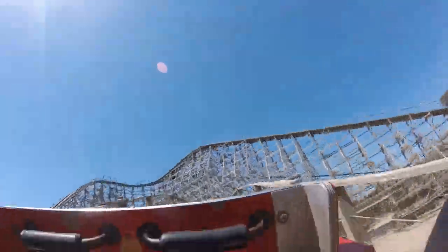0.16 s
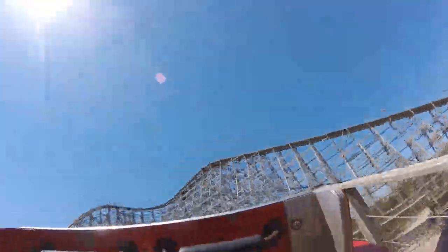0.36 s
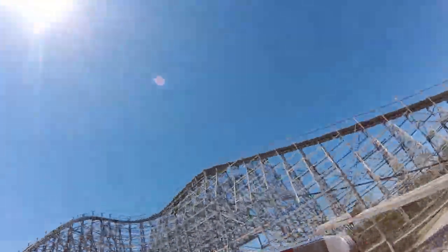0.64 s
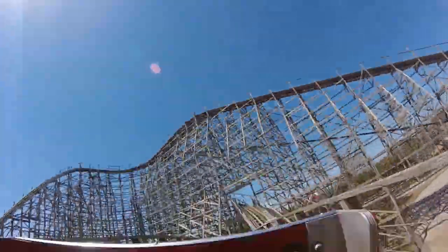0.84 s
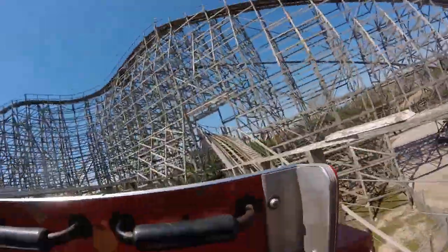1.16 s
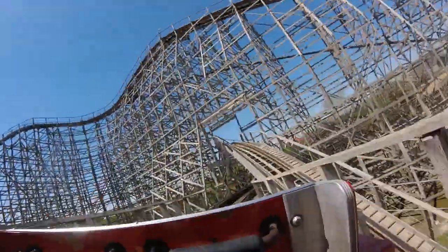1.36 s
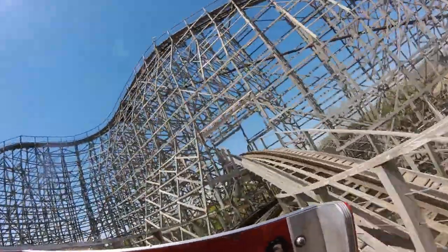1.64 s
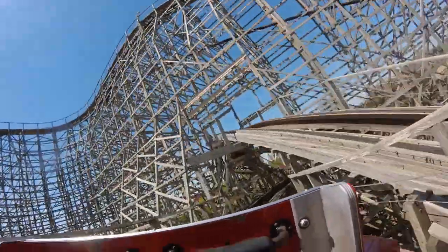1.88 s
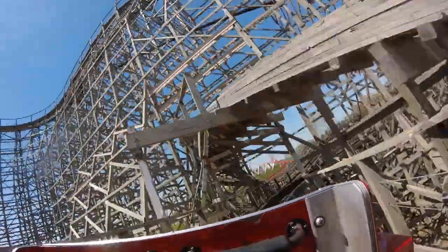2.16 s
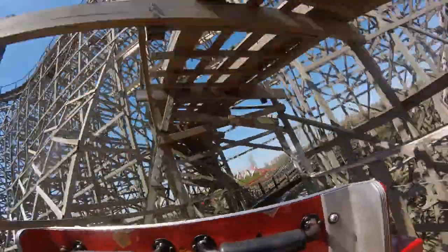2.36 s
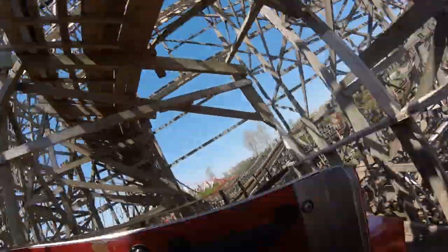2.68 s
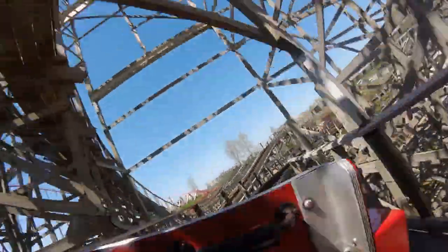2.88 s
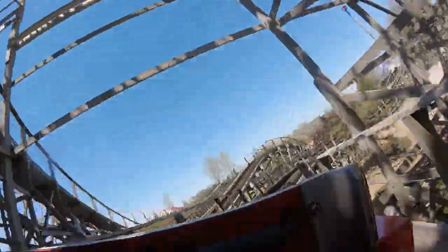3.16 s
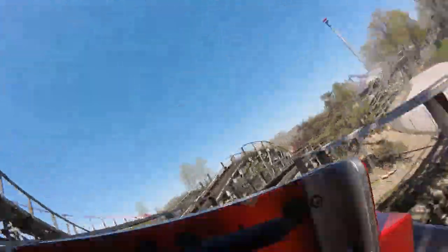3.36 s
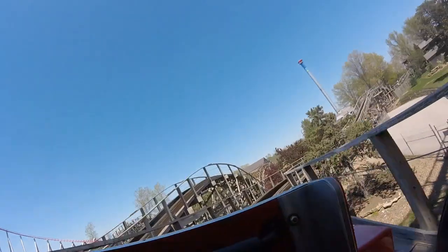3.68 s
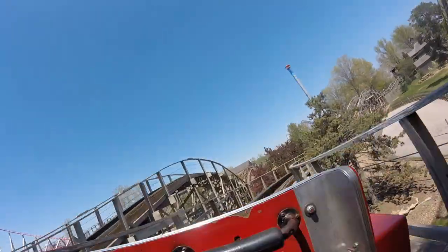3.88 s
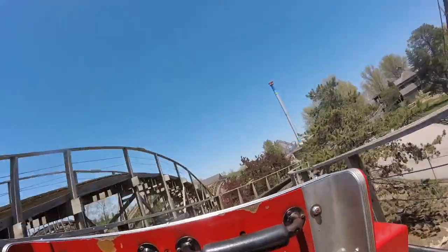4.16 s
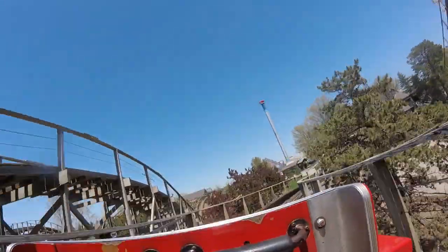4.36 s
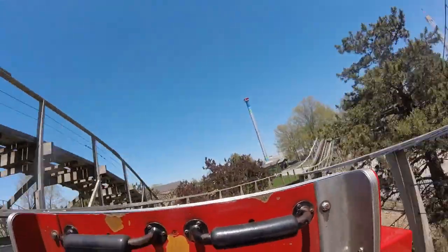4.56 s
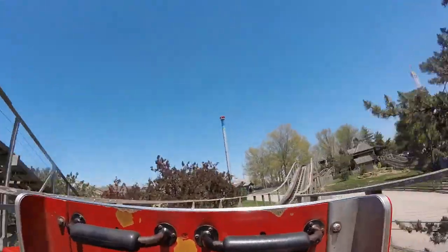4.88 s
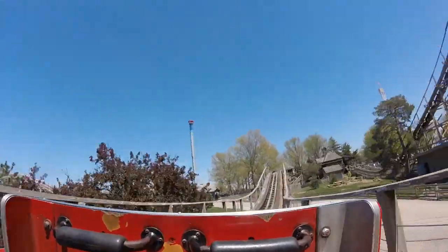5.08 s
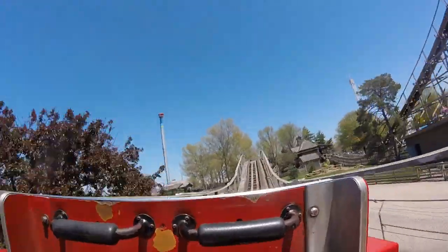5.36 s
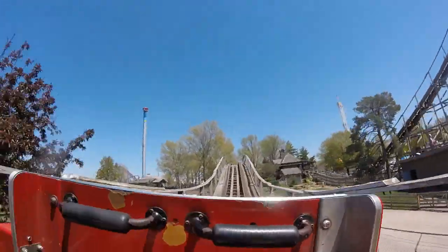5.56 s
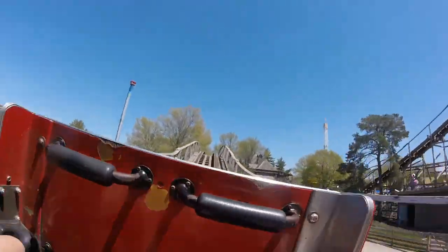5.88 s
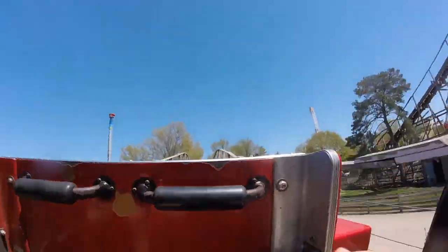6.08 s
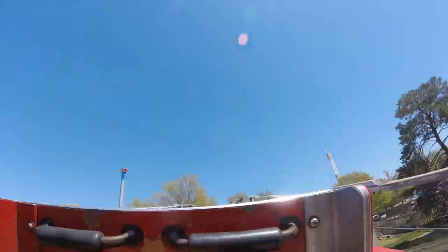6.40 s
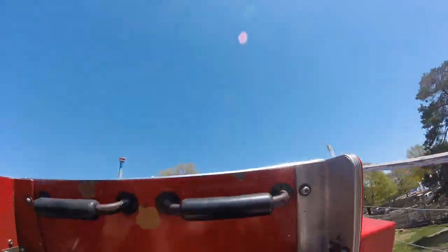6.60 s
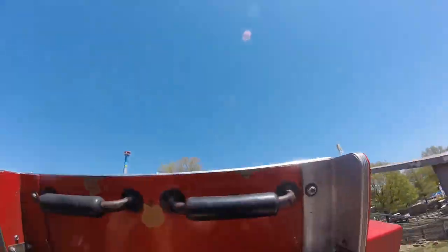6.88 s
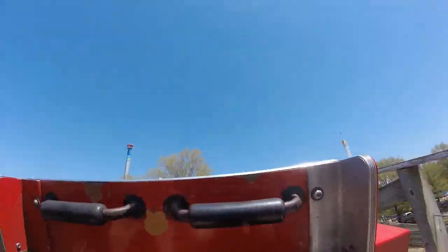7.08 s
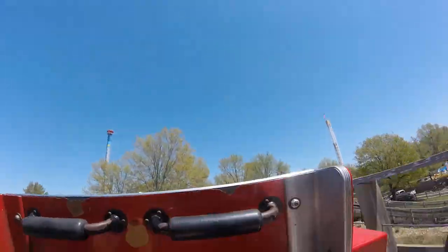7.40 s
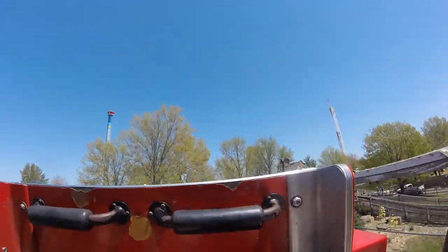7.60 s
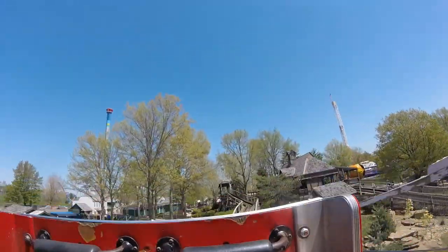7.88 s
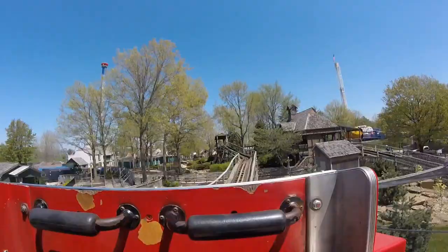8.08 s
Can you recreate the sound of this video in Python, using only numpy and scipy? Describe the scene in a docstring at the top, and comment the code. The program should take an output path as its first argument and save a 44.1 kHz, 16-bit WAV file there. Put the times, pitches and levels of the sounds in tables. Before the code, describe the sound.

A microphone rides in the front car of a wooden roller coaster, outdoors and close, with no noticeable echo. At 0-0.4 s low gust thuds hit, with a hard click at 0.3 and a brief faint jingle of loose parts. The wheel roar is light until about 1 s, when a cluster of strong steel knocks and the first body thump bring full rumble, timber clatter, rattling fittings and panel buzz. From 1.2 to 5.9 s the ride is dense and jolting: several irregular knocks a second, short shudders, deep thumps, a sharp rattling jolt near 2, clicks at 2.4, 3.1 and 5.4, wind flapping low. Between 6 and 7.3 s crisp clicks crowd in, and a gust at 6.4 chokes the other sound hardest. The roar thins around 7.3, another click lands at 7.65, and heavy ringing knocks with a thump close it at 8.05-8.2.

```python
"""The front car of a wooden roller coaster, about eight seconds, with the microphone on board in the wind.
From the start steel wheels roar and knock over rail joints; gusts hit, and a hard click sounds close by.
Loose parts jingle briefly, then from about one second body thumps join the shudders, rattles and panel buzz.
After six seconds close clicks crowd in and a gust chokes the microphone hardest; late knocks end the ride.
Noise through resonances makes roar and rattle, decaying sines the rings, pressure pulses thumps and gusts."""
import sys
import numpy as np
from scipy import signal
from scipy.fft import rfft, irfft, next_fast_len
from scipy.io import wavfile
from scipy.ndimage import uniform_filter1d

SR = 44100
rng = np.random.default_rng(int(sys.argv[2]) if len(sys.argv) > 2 else 0)


def transcribe(signal):
    """Save signal, clipped to [-1, 1], as a 16-bit WAV file at the path in sys.argv[1]."""
    frames = np.atleast_2d(signal).T
    limited = np.clip(frames, -1, 1)
    pcm = np.round(limited * 32767).astype(np.int16)
    wavfile.write(sys.argv[1], SR, pcm)


N = 363384
TIME = np.arange(N) / SR
FFT_SIZE = next_fast_len(N + SR // 2) * 2
BIN_HZ = np.arange(FFT_SIZE // 2 + 1) * SR / FFT_SIZE

# How hard the wheels press and roll on the rail. Each row: time in seconds, relative roar in dB.
ROLLING = [(0, -35), (.18, -43.5), (.3, -32), (.35, -49.5), (.48, -45), (.62, -40.5), (1.04, -33.5),
           (1.27, -28), (1.8, -32), (2.08, -30), (2.37, -37), (2.58, -32), (3.15, -30), (4.0, -35.5),
           (5.25, -33), (5.55, -37), (5.82, -31), (6.45, -37), (7.0, -37), (7.3, -41), (7.6, -33.5),
           (8.03, -39.5), (8.15, -41)]
# The track structure rumbles under the train's weight. Each row: time in seconds, relative rumble in dB.
LOAD = [(0, -45.5), (.3, -28), (.38, -45), (.65, -37), (.78, -31.5), (1.25, -32.5), (1.5, -28.5),
        (1.75, -26), (2.0, -30), (2.4, -31), (3.05, -29), (3.88, -34.5), (4.03, -32.5), (4.35, -30.5),
        (4.75, -30.5), (5.55, -29.5), (6.3, -25.5), (6.7, -31), (7.2, -29.5), (7.5, -31), (7.65, -29.5),
        (8.24, -27)]
# The car sways against the side rail and shudders.
# Each row: start in seconds, length of the hold in seconds, relative rattle in dB.
SHUDDERS = [(0.64, 0.021, -49), (0.868, 0.054, -43), (1.097, 0.12, -38.5), (1.36, 0.12, -43),
            (1.597, 0.4, -51), (1.967, 0.023, -28.5), (2.07, 0.036, -38), (2.149, 0.052, -39),
            (2.463, 0.12, -40), (2.739, 0.16, -42.5), (2.935, 0.2, -41), (3.31, 0.025, -36),
            (3.422, 0.053, -36), (3.573, 0.18, -41), (3.835, 0.051, -40.5), (3.987, 0.066, -46.5),
            (4.274, 0.16, -39.5), (4.512, 0.062, -38.5), (4.62, 0.28, -46), (5.033, 0.099, -39.5),
            (5.178, 0.25, -38), (5.58, 0.054, -45), (5.73, 0.18, -43.5), (5.952, 0.38, -41.5),
            (6.507, 0.037, -40.5), (6.653, 0.13, -47.5), (6.862, 0.36, -43), (7.369, 0.045, -42),
            (7.53, 0.063, -47), (7.744, 0.22, -66), (8.046, 0.22, -41)]
# Wheels knock over the rail joints.
# Each row: start in seconds, relative strength in dB, noise decay by 60 dB in seconds, ring pitch in Hz.
KNOCKS = [(0.264, -24, 0.04, 1394), (0.275, -22, 0.029, 1476), (0.481, -32, 0.091, 1235),
          (.532, -36, 0.054, 1360), (.626, -39, 0.036, 1410), (0.6501, -20.5, 0.11, 1487),
          (0.712, -23.5, 0.03, 1380), (0.8704, -23.5, 0.19, 1460), (0.9817, -20, 0.21, 1420),
          (1.029, -25, 0.036, 1324), (1.085, -10.5, 0.095, 1440), (1.118, -25, 0.035, 1490),
          (1.179, -14, 0.066, 1280), (1.206, -13.5, 0.074, 1442), (1.2118, -15, 0.073, 1480),
          (1.31, -19, 0.097, 1373), (1.349, -19.5, 0.028, 1326), (1.412, -21, 0.04, 1260),
          (1.464, -22, 0.57, 1450), (1.558, -21.5, 0.032, 1390), (1.621, -17.5, 0.15, 1364),
          (1.64, -23, 0.047, 1440), (1.791, -23, 0.055, 1260), (1.852, -21, 0.09, 1340),
          (1.892, -24, 0.04, 1300), (1.964, -21, 0.1, 1400), (1.985, -16.5, 0.36, 1260),
          (2.07, -14.5, 0.057, 1440), (2.0784, -14.5, 0.098, 1450), (2.107, -18, 0.029, 1355),
          (2.168, -22, 0.058, 1420), (2.242, -21, 0.12, 1395), (2.34, -24.5, 0.04, 1340),
          (2.47, -22, 0.029, 1510), (2.5263, -22, 0.03, 1420), (2.554, -19, 0.069, 1416),
          (2.573, -22, 0.037, 1340), (2.672, -22.5, 0.07, 1310), (2.704, -23, 0.044, 1470),
          (2.785, -25, 0.044, 1310), (2.832, -18, 0.072, 1495), (2.882, -27, .04, 1410),
          (2.946, -21, 0.06, 1420), (2.9535, -16.5, 0.079, 1386), (2.9855, -16.5, 0.11, 1266),
          (3.038, -19, 0.033, 1400), (3.0437, -15, 0.035, 1340), (3.102, -15.5, 0.091, 1395),
          (3.121, -18, 0.081, 1405), (3.343, -25, 0.04, 1350), (3.44, -29, 0.044, 1280),
          (3.469, -21.5, 0.044, 1434), (3.5, -21, 0.065, 1440), (3.566, -16, 0.094, 1385),
          (3.608, -16.5, 0.05, 1450), (3.673, -17.5, 0.05, 1520), (3.7, -22, .04, 1420),
          (3.7157, -16, 0.035, 1310), (3.8, -25.5, 0.049, 1464), (4.1286, -20, 0.09, 1430),
          (4.318, -20.5, 0.04, 1290), (4.3598, -22, 0.041, 1315), (4.402, -18.5, 0.12, 1345),
          (4.424, -15, 0.079, 1370), (4.542, -23, 0.072, 1384), (4.561, -25, 0.04, 1330),
          (4.616, -23.5, 0.037, 1330), (4.66, -23, 0.036, 1430), (4.689, -17, 0.016, 1316),
          (4.722, -37, 0.028, 1400), (4.7592, -15, 0.048, 1386), (4.79, -20.5, 0.1, 1320),
          (4.8645, -21, 0.093, 1440), (4.89, -20, 0.03, 1410), (5.02, -20, 0.05, 1350),
          (5.046, -19.5, .05, 1310), (5.095, -29, 0.033, 1390), (5.1165, -25, 0.042, 1270),
          (5.191, -20, 0.19, 1310), (5.208, -19, .06, 1370), (5.235, -20, 0.055, 1350),
          (5.392, -19, 0.082, 1445), (5.488, -18.5, 0.041, 1420), (5.602, -22, 0.078, 1437),
          (5.628, -22.5, 0.03, 1310), (5.67, -20, 0.04, 1260), (5.79, -16.5, 0.11, 1410),
          (5.814, -18.5, 0.028, 1440), (5.887, -24, 0.028, 1340), (6, -20, 0.03, 1290),
          (6.179, -22.5, 0.17, 1300), (6.221, -17, 0.091, 1570), (6.249, -19.5, 0.072, 1220),
          (6.444, -19.5, 0.016, 1270), (6.657, -14.5, 0.045, 1336), (6.753, -32, 0.04, 1270),
          (6.871, -24.5, 0.086, 1235), (7.012, -23, 0.05, 1360), (7.5528, -24, 0.047, 1390),
          (7.606, -19.5, 0.051, 1185), (7.674, -29, 0.07, 1370), (7.8924, -20, 0.18, 1193),
          (8.053, -12, 0.22, 1520), (8.13, -18, 0.59, 1440), (8.173, -23, 0.04, 1360),
          (8.194, -28, .04, 1400)]
# A struck wheel rings. Each row: multiple of the ring pitch, decay by 60 dB in seconds, relative dB.
WHEEL_MODES = [(.87, 0.054, -1.5), (1.001, 0.047, 4.5), (1.089, 0.12, -6.5), (2.03, 0.024, -12)]
# Timber under a struck wheel knocks short and dry. Each row: Hz, decay by 60 dB in seconds, relative dB.
PLANK_MODES = [(336, .035, -1.5), (475, 0.027, -5.5), (704, 0.027, -0.5), (940, 0.011, -1)]
# Resonances of wheels and car. Each row: centre in Hz, width in Hz, relative dB.
CAR_MODES = [(1016, 300, -10), (1243, 91, -4.5), (1456, 297, -2.5), (1817, 112, -12.5), (2046, 82, -15)]
# Resonances of the thin sheet panels. Each row: centre in Hz, width in Hz, relative dB.
PANEL_MODES = [(2380, 790, -17.5), (2800, 430, -2), (3156, 150, -5.5)]
# How freely the sheet panels buzz. Each row: time in seconds, gain in dB.
PANEL_BUZZ = [(0, 0.5), (1.1, 0), (2.5, -.5), (4.5, 0.5), (5.6, 0), (6.2, 3), (7.0, 2.5), (8.24, 2.5)]
# Resonances of the loose steel fittings. Each row: centre in Hz, width in Hz, relative dB.
FITTING_MODES = [(3460, 190, 6), (3820, 430, -0.5), (4420, 550, 3.5), (4950, 210, 2), (5280, 130, 3),
                 (5480, 250, -3), (6190, 470, 2), (6700, 1450, -9), (7440, 920, -8), (8300, 950, -19.5)]
# Spectra of timber, track rumble and bright sizzle. Each row: frequency in Hz, relative dB per Hz.
TIMBER_SPECTRUM = [(150, -14), (260, -1.5), (350, 1), (500, -2), (650, -2.5), (770, -2.5), (920, -9),
                   (1300, -3), (2500, -98.5)]
RUMBLE_SPECTRUM = [(35, -30), (70, -1), (110, 3.5), (160, -0.5), (220, -5), (300, -11), (600, -71)]
SIZZLE_SPECTRUM = [(7000, -28), (8800, -5), (10500, 3), (12000, -11.5), (13500, -27.5), (15500, -31.5)]
# The car body thumps. Each row: start in seconds, peak of the push in dB, length of the push in seconds.
THUMPS = [(1.169, -13, 0.0029), (1.428, -16, 0.0064), (1.499, -10.5, 0.015), (1.972, -11.5, 0.0095),
          (1.984, -23, 0.0028), (2.079, -8.5, 0.0042), (2.126, -20, .012), (2.582, -10, 0.0065),
          (3.119, -9, 0.0079), (3.502, -11, 0.009), (3.56, -25, 0.0092), (3.612, -13, 0.0065),
          (3.757, -16.5, 0.008), (3.918, -10.5, 0.011), (4.308, -10, 0.011), (4.429, -20, 0.012),
          (4.822, -12, 0.018), (4.963, -16, 0.0049), (5.07, -13.5, 0.0036), (5.188, -13, 0.0047),
          (5.299, -11, 0.015), (5.7676, -8, 0.0071), (5.927, -11.5, 0.0077), (6.015, -11, 0.0084),
          (6.262, -24, 0.0091), (6.542, -10, 0.01), (6.687, -10.5, 0.004), (7.126, -10, 0.0037),
          (8.17, -11, 0.0071)]
# Hard clicks beside the microphone.
# Each row: start in seconds, relative level in dB, hardness in dB per octave from 2 kHz, pitch in Hz.
CLICKS = [(0.304, -13, -11, 2030), (2.397, -7, -7.5, 2130), (3.1095, -9, -13, 2000), (5.4136, -30, 8, 2000),
          (6.0187, -21.5, 10, 2150), (6.375, -17, -5, 1950), (6.5422, -12.5, 4, 1960),
          (6.6870, -20, 10, 2060), (6.949, -19.5, 3, 2000), (7.1254, -21.5, 7, 1950), (7.274, -29, 2, 2000),
          (7.6578, -12, -11, 1950)]
# Resonances of the clicking part at 2 kHz pitch. Each row: Hz, decay by 60 dB in seconds, relative dB.
CLICK_MODES = [(636, 0.0062, -12), (1400, 0.009, -10), (1937, 0.009, -1), (2300, 0.0055, 0),
               (2650, 0.0065, -3), (3110, 0.011, -10), (3930, 0.01, -14), (5530, 0.0068, -17)]
# Spectrum of the crack in a click. Each row: frequency in Hz, relative dB per Hz.
CRACK_SPECTRUM = [(150, -5), (500, 3), (1400, -13.5), (2000, 15.5), (2700, -3.5), (3600, -22.5),
                  (5000, -27), (6300, -14.5), (8000, -27), (12000, -39)]
# Loose parts drop back. Each row: start in seconds, level in dB, decay by 60 dB in seconds.
JINGLES = [(.345, -50, .05), (.368, -50, .04), (.386, -52, 0.066), (.415, -53, 0.055), (6.835, -45, .04),
           (6.852, -47, .03), (7.839, -32, 0.027)]
# A thin high whine that comes and goes. Each row: time in seconds, relative level in dB.
WHINE = [(0, -85), (.8, -93), (1.2, -85), (1.9, -80), (2.4, -89), (4, -86.5), (7.3, -89), (7.7, -89),
         (8.24, -82)]
# Airflow over the microphone. Each row: time in seconds, relative buffeting in dB.
WIND = [(0, -18.5), (.4, -21.5), (.9, -22.5), (1.5, -23.5), (1.95, -11.5), (2.8, -17), (3.75, -17.5),
        (4.25, -22), (4.55, -19), (5.1, -17), (5.9, -16.5), (6.3, -14), (6.6, -32), (7.38, -17),
        (7.65, -26), (8.08, -30), (8.2, -15.5)]
# Spectrum of the buffeting. Each row: frequency in Hz, relative dB per Hz.
BUFFET_SPECTRUM = [(4, -11), (12, 2), (22, 2), (32, -10.5), (48, -14), (70, -24.5), (140, -39), (500, -100)]
# Gusts hit the microphone.
# Each row: time of the snap in seconds, pressure peak in dB, dip of other sound in dB (negative lifts it).
GUSTS = [(0.035, -5.5, 4.5), (0.137, -8, -5.5), (0.311, -5, 10), (1.52, -12.5, 2.5), (2.405, -7.5, -3.5),
         (3.251, -8, 2.5), (3.54, -10, 0), (3.746, -7, -4.5), (3.941, -7.5, -1.5), (4.451, -7, -1.5),
         (4.125, -9, -0.5), (4.8, -15.5, -1), (4.948, -9.5, -2.5), (5.326, -7.5, 2.5), (5.469, -7.5, -0.5),
         (5.665, -7.5, 0.5), (6.024, -5.5, 6), (6.389, -5, 17.5), (6.619, -7, 12.5), (6.803, -8, 9.5),
         (7.041, -8, 4.5), (7.28, -7.5, -2.5)]

# timber and rattle follow the roar: relative level at the usual roar, and exponent on its swing
USUAL_ROAR_DB = -33
TIMBER_DB, TIMBER_FOLLOWS = -33, 0.88
RATTLE_DB, RATTLE_FOLLOWS = -46.5, 0.71
# what a shudder adds to the other layers, relative to its rattle
SHUDDER_WHEELS_DB, SHUDDER_TIMBER_DB, SHUDDER_RUMBLE_DB = 7.5, 5.5, 8.5
SHUDDER_ATTACK_S, SHUDDER_RELEASE_S = 0.005, 0.023
# noise stirred by a knock, relative to its strength
KNOCK_ROAR_DB, KNOCK_THUD_DB, KNOCK_RATTLE_DB = -8.3, -10.3, -30.5
KNOCK_RISE_S = 0.0012
HEAVE_DB, HEAVES_PER_S = 2.0, 2.5
CHATTER_DB, CHATTER_SPREAD_DB = 8, 9
CLICK_USUAL_HZ, WHINE_HZ, CUTOFF_HZ = 2000, 9650, 15700
CHOKE_RECOVERY_S = 0.018


def from_db(db):
    """Decibels to gain."""
    return 10 ** (np.asarray(db) / 20)


def rms_one(x):
    """Scale to unit power."""
    return x / np.sqrt(np.mean(x ** 2) + 1e-20)


def gain_in_time(rows):
    """A dB curve as a gain per sample."""
    s, db = np.transpose(rows)
    return from_db(np.interp(TIME, s, db))


def drift(rate):
    """Slow random wandering with spread 1: noise through two equal low-pass poles at rate (Hz)."""
    step = 40  # samples between drawn values
    pole = np.exp(-2 * np.pi * rate * step / SR)
    draws = rng.standard_normal(N // step + 2002)
    slow = signal.lfilter([1], [1, -2 * pole, pole * pole], draws)[2000:]  # drop the settling
    return np.interp(np.arange(N) / step, np.arange(len(slow)), rms_one(slow))


def sloped(points):
    """Frequency response through (Hz, dB) points, straight over log frequency."""
    hz, db = np.transpose(points)
    return from_db(np.interp(np.log(BIN_HZ + 1e-9), np.log(hz), db))


def resonant(modes):
    """Frequency response of steep-sided resonances whose powers add."""
    power = 0
    for hz, width, db in modes:
        offset = (BIN_HZ - hz) / width
        power = power + (from_db(db) / (1 + 2 * offset ** 2)) ** 2
    return np.sqrt(power)


def noise(response, even_s):
    """Coloured noise of unit power, its level evened over even_s."""
    x = irfft(rfft(rng.standard_normal(FFT_SIZE)) * response)[:N]
    power = uniform_filter1d(x ** 2, max(int(even_s * SR), 2))
    return x / np.sqrt(power + 1e-20)


def blows(times, levels_db, rise_s, t60s):
    """Envelope of blows that swell quickly and die away; their powers add."""
    power = np.zeros(N)
    for s, db, t60 in zip(times, levels_db, t60s):
        start = int(s * SR)
        age = TIME[:min(SR // 2, N - start)]
        shape = (1 - np.exp(-age / rise_s)) * np.exp(-np.log(1000) * age / t60)
        power[start:start + len(age)] += (from_db(db) * shape / shape.max()) ** 2
    return np.sqrt(power)


def clatter(per_s, spread_db, t60, steady):
    """Envelope of many small random impacts over a steady share of power; mean power about one."""
    hits = rng.random(N) < per_s / SR
    impacts = hits * from_db(spread_db * (2 * rng.random(N) - 1)) ** 2
    decay = np.exp(-2 * np.log(1000) / (t60 * SR))
    power = signal.lfilter([1], [1, -decay], impacts)
    power = power / (uniform_filter1d(power, SR // 6) + 1e-9)
    envelope = np.sqrt(steady + (1 - steady) * np.maximum(power, 0))
    return uniform_filter1d(envelope, SR // 700)


def add(out, s, sound):
    """Mix a sound in at time s."""
    start = max(int(s * SR), 0)
    out[start:start + len(sound)] += sound[:max(N - start, 0)]


def struck(modes, rise_s, detune):
    """One blow: every mode is a decaying sine with a random strength and tuning of its own."""
    age = TIME[:SR // 12]
    total = np.zeros(len(age))
    for hz, t60, db in modes:
        stray_db, tuning = rng.standard_normal(2)
        decay = np.exp(-np.log(1000) * age / t60)
        tone = np.sin(2 * np.pi * hz * (1 + detune * tuning) * age)
        total += from_db(db + stray_db) * decay * tone
    return total * (1 - np.exp(-age / rise_s))


def train(rumble, timber, wheels, rattle):
    """Rolling and knocking shake the timber, the car, its panels and its fittings together."""
    s, knock_db, t60, _ = np.transpose(KNOCKS)
    shaking = from_db(-1.9) * clatter(per_s=100, spread_db=5, t60=0.045, steady=0.42)
    jingling = clatter(per_s=180, spread_db=9, t60=0.088, steady=0.23)

    heave = from_db(-1.3 + HEAVE_DB * drift(HEAVES_PER_S))
    track = rumble * heave * noise(sloped(RUMBLE_SPECTRUM), even_s=0.04)

    thuds = blows(s, knock_db + KNOCK_THUD_DB, 0.0048, t60)
    wood = np.hypot(timber * shaking, thuds) * noise(sloped(TIMBER_SPECTRUM), even_s=0.023)

    knocked = blows(s, knock_db + KNOCK_ROAR_DB, KNOCK_RISE_S, t60)
    rolling = np.hypot(wheels * shaking, knocked)
    steel = rolling * noise(resonant(CAR_MODES), even_s=0.01)

    # loose parts are thrown up by a knock and settle a little after it
    tossed = blows(s, knock_db + KNOCK_RATTLE_DB, 0.015, t60)
    thrown = jingling * np.hypot(from_db(-6.5) * rattle * np.sqrt(shaking), tossed)
    loose = thrown * noise(resonant(FITTING_MODES), even_s=0.023)

    # the panels buzz with both the wheels and the fittings
    driven = np.hypot(from_db(-12) * rolling, from_db(-3) * rattle * shaking)
    panels = gain_in_time(PANEL_BUZZ) * driven * noise(resonant(PANEL_MODES), even_s=0.013)

    # the top octave grows faster than the rattle itself
    sizzle = from_db(-9) * thrown ** 1.5 * noise(sloped(SIZZLE_SPECTRUM), even_s=0.04)
    return track + wood + steel + panels + loose + sizzle


def ride():
    """Gains of rumble, timber, wheels and rattle: they follow load and rolling, and swell in a shudder."""
    roar, shudder = gain_in_time(ROLLING), shudders()
    effort = roar / from_db(USUAL_ROAR_DB)
    rumble = np.hypot(gain_in_time(LOAD), from_db(SHUDDER_RUMBLE_DB) * shudder)
    timber = np.hypot(from_db(TIMBER_DB) * effort ** TIMBER_FOLLOWS, from_db(SHUDDER_TIMBER_DB) * shudder)
    wheels = np.hypot(roar, from_db(SHUDDER_WHEELS_DB) * shudder)
    rattle = np.hypot(from_db(RATTLE_DB) * effort ** RATTLE_FOLLOWS, shudder)
    return rumble, timber, wheels, rattle


def shudders():
    """Each shudder builds quickly, holds and dies away; their powers add."""
    power, age = np.zeros(N), TIME[:SR]
    for s, length, db in SHUDDERS:
        release = np.exp(-np.maximum(age - length, 0) / SHUDDER_RELEASE_S)
        shape = np.minimum(age / SHUDDER_ATTACK_S, 1) * release
        add(power, s, (from_db(db) * shape) ** 2)
    return np.sqrt(power)


def wheel_blows(wheels, knock_db, plank_db, chatter_hz, count):
    """Wheel and timber ring at every knock; the wheels also ring at small flaws strewn along the rail."""
    out = np.zeros(N)
    for s, strength_db, _, hz in KNOCKS:
        modes = [(ratio * hz, t60, db) for ratio, t60, db in WHEEL_MODES]
        ring = struck(modes, rise_s=0.00093, detune=0.022)
        plank = struck(PLANK_MODES, rise_s=0.0006, detune=0.1)
        add(out, s, from_db(strength_db + knock_db) * ring / np.abs(ring).max())
        add(out, s, from_db(strength_db + plank_db) * plank / np.abs(plank).max())
    # flaws fall at random times; their rings are shorter and scale with the roar
    flaw_modes = [(ratio * chatter_hz, 0.76 * t60, db) for ratio, t60, db in WHEEL_MODES]
    for when, softness in rng.random((count, 2)):
        at = int(when * N)
        ring = struck(flaw_modes, rise_s=0.00087, detune=0.092)
        level = wheels[at] * from_db(CHATTER_DB - CHATTER_SPREAD_DB * softness)
        add(out, at / SR, level * ring / np.abs(ring).max())
    return out


def thumps(swing_db, swing_cycles, swing_share):
    """A jolt is one short push; the damped body then swings briefly, slower after a longer push."""
    out = np.zeros(N)
    for s, db, length in THUMPS:
        hz = swing_share / length
        push = np.sin(np.pi * np.minimum(TIME[:SR // 40] / length, 1)) ** 2
        swing = struck([(hz, swing_cycles / hz, db + swing_db)], rise_s=0.00049, detune=0.034)
        add(out, s, -from_db(db) * push)
        add(out, s + 0.7 * length, swing)
    return out


def clicks(crack_db, crack_t60, body_db, body_t60):
    """A hard contact cracks, rings a few short modes and stirs the car body; hardness lifts outlying modes."""
    out = np.zeros(N)
    for s, db, hardness_db, pitch in CLICKS:
        for k, (hz, t60, mode_db) in enumerate(CLICK_MODES):
            octaves = abs(np.log2(hz / CLICK_USUAL_HZ))
            mode = (hz * pitch / CLICK_USUAL_HZ, t60, db + mode_db + hardness_db * octaves)
            # neighbouring modes start in opposite directions
            add(out, s, (-1) ** k * struck([mode], rise_s=0.0002, detune=0.01))
    s, db, hardness_db, _ = np.transpose(CLICKS)
    crack_envelope = blows(s, db + crack_db, 0.00014, np.full(len(s), crack_t60))
    crack = crack_envelope * noise(sloped(CRACK_SPECTRUM), even_s=0.00045)
    body_envelope = blows(s, db + body_db + 0.97 * hardness_db, 0.0024, np.full(len(s), body_t60))
    body = body_envelope * noise(resonant(CAR_MODES + PANEL_MODES), even_s=0.0059)
    return out + crack + body


def jingles():
    """Loose parts drop back into place: short noise bursts through panel and car resonances."""
    s, db, t60 = np.transpose(JINGLES)
    return blows(s, db, 0.0018, t60) * noise(resonant(PANEL_MODES + CAR_MODES[1:]), even_s=0.008)


def wind(swell_s, snap_s, suck_s, suction_db, surge_db):
    """Lumpy buffeting; in a gust the pressure builds, snaps into suction and relaxes."""
    gusts, calm = np.zeros(N), np.ones(N)
    for s, db, _ in GUSTS:
        age = TIME - s
        fade = np.exp(-np.abs(age) / np.where(age < 0, swell_s, suck_s))
        shape = -np.tanh(age / snap_s) * fade
        pressure = shape / shape.max()
        suction = -from_db(suction_db) * shape / shape.min()
        gusts += from_db(db) * np.where(age < 0, pressure, suction)
        calm *= 1 - 0.5 * np.exp(-(age / 0.08) ** 2)  # one big eddy displaces the small ones
    surge = from_db(3.5 + surge_db * drift(1.9))
    buffeting = surge * gain_in_time(WIND) * calm * noise(sloped(BUFFET_SPECTRUM), even_s=0.2)
    return gusts + buffeting


def choking(onset_s):
    """A gust pins the diaphragm, so other sound dips and recovers; negative rows lift it instead."""
    dip_db = np.zeros(N)
    for s, _, choke_db in GUSTS:
        age = np.maximum(TIME - s, 0)
        shape = (1 - np.exp(-(age / onset_s) ** 2)) * np.exp(-age / CHOKE_RECOVERY_S)
        dip_db += choke_db * shape / shape.max()
    return from_db(-dip_db)


def whine():
    """A faint, wavering tone: noise through one very narrow resonance."""
    return from_db(3) * gain_in_time(WHINE) * noise(resonant([(WHINE_HZ, 5, 0)]), even_s=0.04)


def scene():
    """Train and close clicks reach the on-board microphone through the wind."""
    rumble, timber, wheels, rattle = ride()
    rolling = train(rumble, timber, wheels, rattle)
    ringing = wheel_blows(wheels, knock_db=-2, plank_db=-9, chatter_hz=1400, count=200)
    jolts = thumps(swing_db=-5.5, swing_cycles=3.5, swing_share=0.8)
    clicking = clicks(crack_db=-11.5, crack_t60=0.013, body_db=-17, body_t60=0.022)
    on_board = rolling + ringing + jolts + clicking + jingles() + whine()
    airflow = wind(swell_s=0.013, snap_s=0.018, suck_s=0.0078, suction_db=3, surge_db=2)
    return (on_board * choking(onset_s=0.065) + airflow)[None]


def record(dry):
    """The microphone signal: the largest swings are held softly and the top is cut."""
    held = dry / (1 + (dry / 0.95) ** 8) ** (1 / 8)
    return signal.sosfilt(signal.cheby2(12, 70, CUTOFF_HZ, fs=SR, output="sos"), held)


dry = scene()
out = record(dry)
transcribe(out)
```